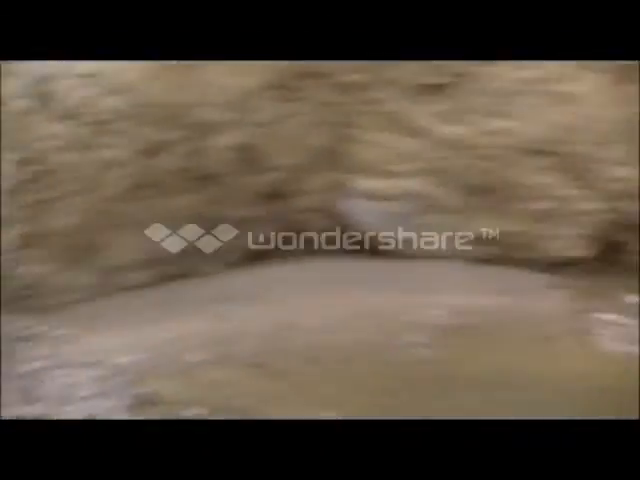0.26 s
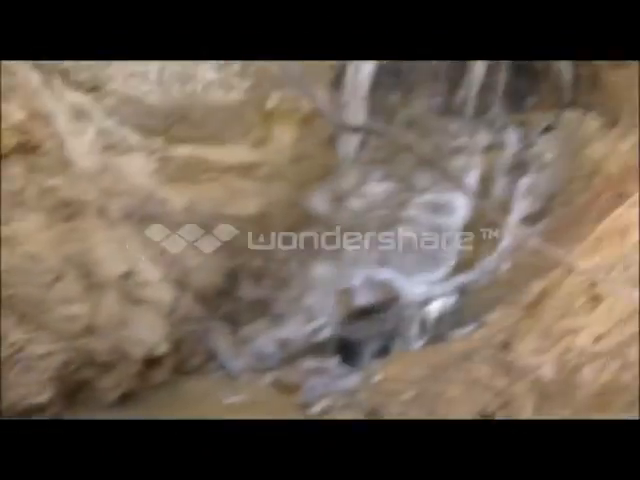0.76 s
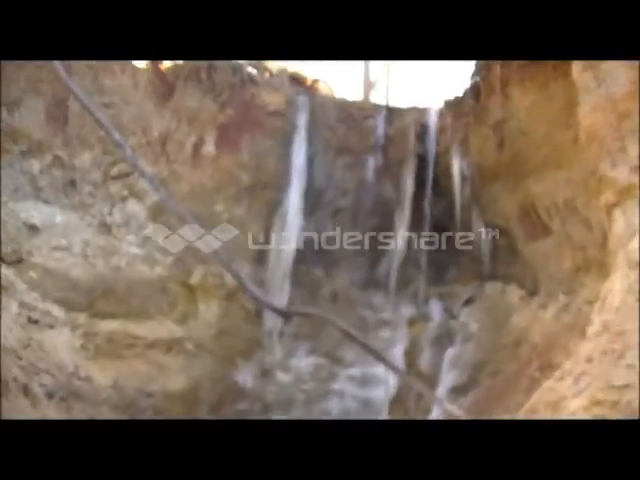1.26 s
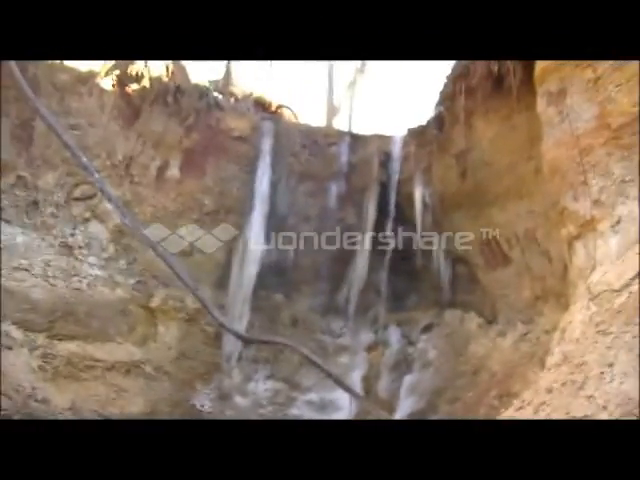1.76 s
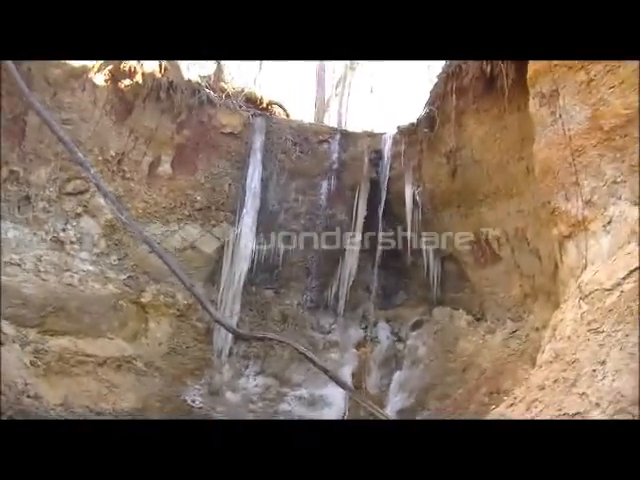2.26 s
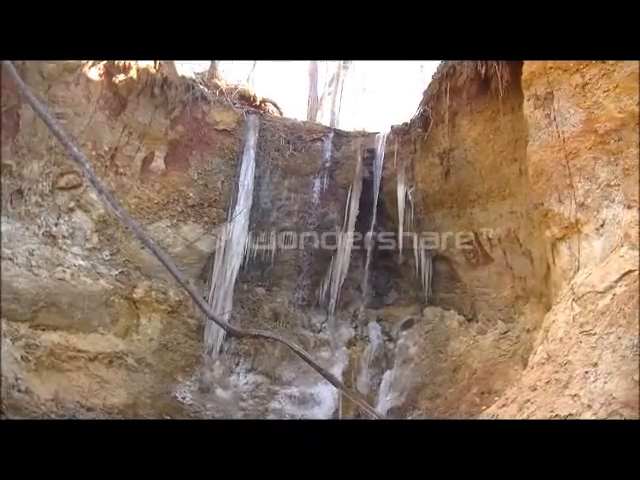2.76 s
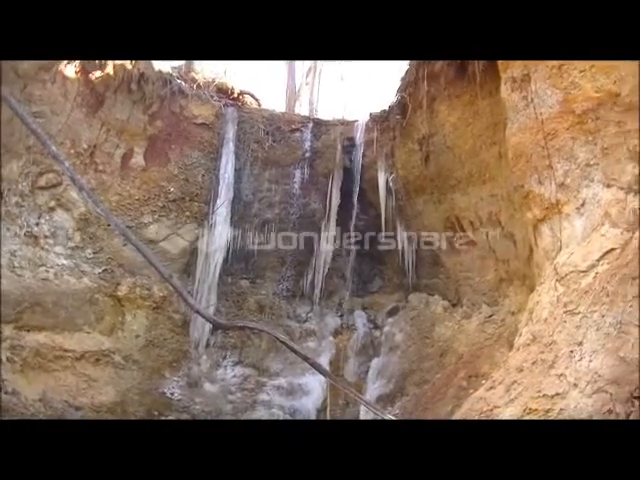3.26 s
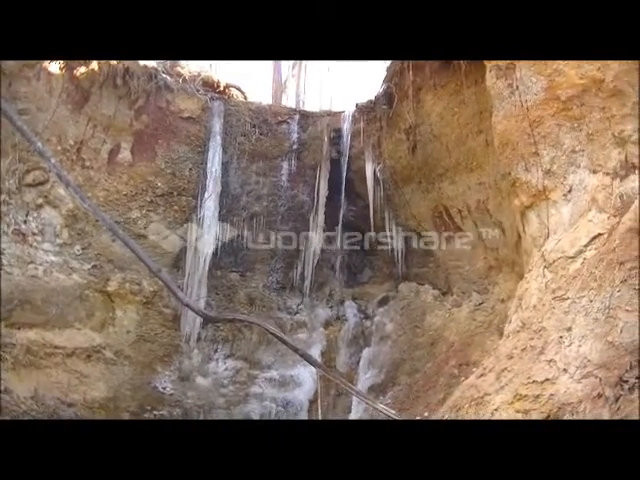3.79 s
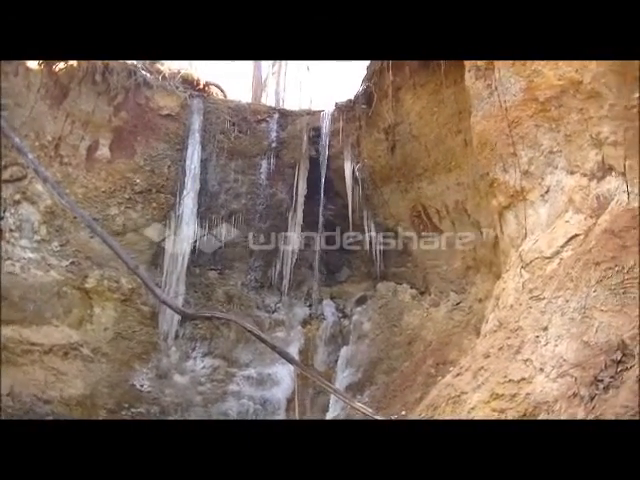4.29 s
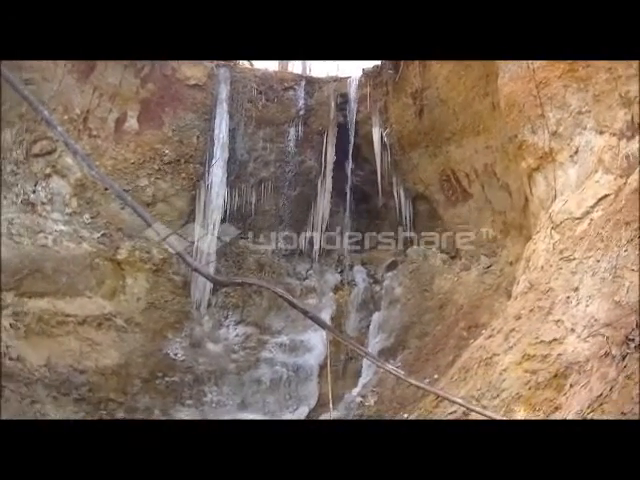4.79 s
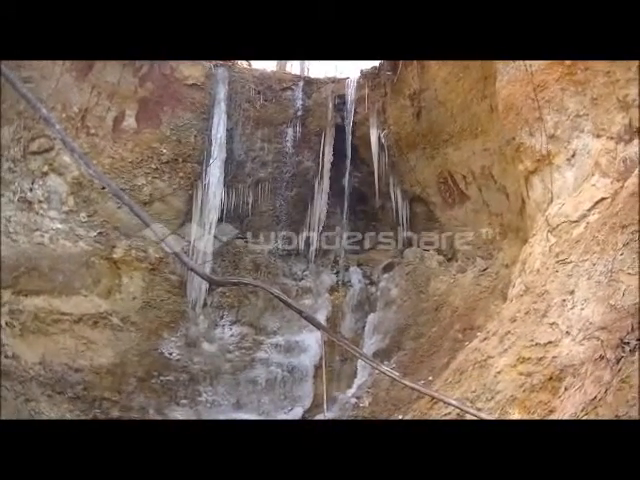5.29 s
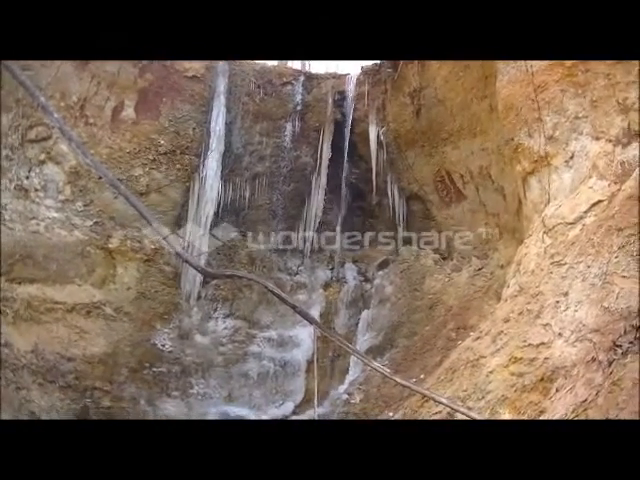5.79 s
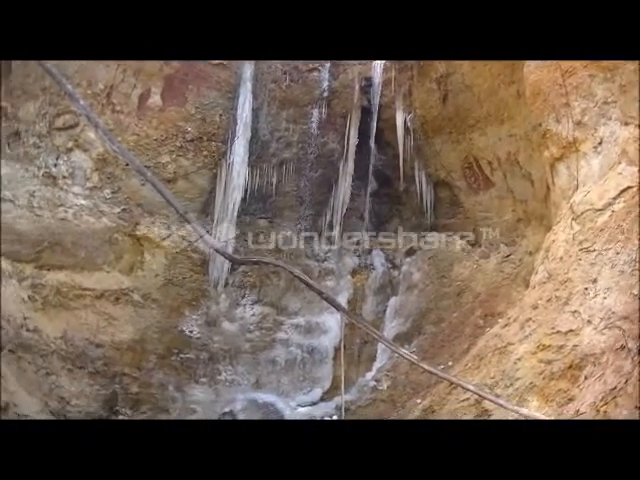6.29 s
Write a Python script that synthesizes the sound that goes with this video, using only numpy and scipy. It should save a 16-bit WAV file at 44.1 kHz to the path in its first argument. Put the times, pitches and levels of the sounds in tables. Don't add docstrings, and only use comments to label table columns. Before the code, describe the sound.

A thin waterfall in a small icy gorge, heard from a few metres away. From 0 to 0.5 s the camera swings round: the wash is slightly dull and off-centre, with a low soft puff of air on the microphone around 0.3 s, then the sound centres and brightens. A continuous broad hiss of dense droplets follows, full from low-mid to treble, fluttering in tiny surges and short lulls. Sharp ticks and wet slaps with brief spray come irregularly, several per second. A hollow plop sounds at 1.36 s; around 1.7 s a brief gush brings a cluster of plops and slaps, with a strong slap at 1.86 s. From 2 to 4 s it is steadier, with a stronger slap and spray at 4.03 s. Small plops return near 5.4 s amid more slaps to 6.1 s, and the hardest, lower slap lands at 6.47 s. The water continues to the end without fading.

```python
import sys
import numpy as np
from scipy import signal
from scipy.fft import rfft, irfft, next_fast_len
from scipy.io import wavfile
from scipy.ndimage import uniform_filter1d

SR = 44100
rng = np.random.default_rng(int(sys.argv[2]) if len(sys.argv) > 2 else 0)


def makeup_ratio(level_db):
    decades = np.asarray(level_db, float) / 20
    return 10 ** decades


def inscribe(sig):
    pcm = np.round(np.clip(np.atleast_2d(sig).T, -1, 1) * 32767)
    wavfile.write(sys.argv[1], SR, pcm.astype(np.int16))


N = 288656


def evened(x):
    return x / np.sqrt(np.mean(x ** 2) + 1e-20)


def smoothed_noise(count, size):
    return evened(uniform_filter1d(rng.standard_normal(count), size))


def filtered(x, order, hz, kind):
    return signal.sosfilt(signal.butter(order, hz, kind, fs=SR, output="sos"), x)


def read(points, hz):
    f, value = np.transpose(points)
    return np.interp(np.log(hz + 1), np.log(f + 1), value)


def follow(rows, t):
    s, *columns = np.transpose(rows)
    return [np.interp(t, s, c) for c in columns]


def add(mix, s, sound):
    part = mix[round(s * SR):][:len(sound)]
    part += sound[:len(part)]


def ramp(hz, from_hz, octaves):
    return np.clip(np.log2((hz + 1) / from_hz) / octaves, 0, 1)[:, None]


def mottle(frames, bins, tall, long):
    noise = rng.standard_normal((frames, bins)).T
    return evened(uniform_filter1d(uniform_filter1d(noise, tall, axis=0), long, axis=1))


def ring(hz, t60, glide, rise):
    t = np.arange(int(t60 * SR) + 8) / SR
    swell = 1 - np.exp(-t / rise)
    return swell * makeup_ratio(-60 * t / t60) * np.sin(2 * np.pi * hz * t * (1 + glide * t / t60))


# (t/s, level/dB)
AIR = [
    (0, -62),
    (.27, -53),
    (.6, -86),
    (1.07, -79),
    (2.4, -97),
    (3.7, -75),
    (5.5, -73),
    (6.15, -88),
    (6.4, -71),
]


def breeze():
    first, second = rng.standard_normal((2, N))
    lumps = evened(filtered([first, 1.1 * second - 0.45 * first], 3, [24, 75], "bandpass"))
    gusts = evened(uniform_filter1d(uniform_filter1d(rng.standard_normal(N), 4000), 4000))
    lumpy_db = 6
    return lumps * makeup_ratio(follow(AIR, np.arange(N) / SR)[0] - 1.0 + lumpy_db * gusts)


# (t/s, peak level/dB, f/Hz, t60/s)
POCKETS = [(.487, -36, 470, 0.13), (1.15, -29.5, 500, 0.065), (1.362, -20.5, 540, .035),
           (1.697, -32, 423, .03), (1.71, -34, 595, .04), (1.724, -25, 495, 0.04), (1.731, -25, 332, 0.041),
           (1.7353, -31, 404, 0.021), (1.741, -28, 967, 0.048), (2.063, -37, 644, 0.036),
           (2.313, -40, 850, .04), (3.57, -41, 150, 0.13), (3.798, -34.5, 630, 0.058),
           (4.134, -33.5, 910, 0.052), (4.223, -38.5, 158, 0.1), (4.739, -39, 130, 0.15),
           (5.368, -29, 651, 0.045), (5.421, -34, 610, 0.079), (6, -33, 485, 0.046)]


def plops():
    out = np.zeros(N)
    for s, db, hz, t60 in POCKETS:
        add(out, s + 0.00097, makeup_ratio(db + 1.0) * ring(hz, t60, .05, 2.0 / hz))
        add(out, s + 0.00083, makeup_ratio(db + 12.0) * ring(1.33 * hz, 2.9 / hz, 0.036, 0.36 / hz))
    return filtered(out, 2, 110, "highpass")


def small_slaps():
    per_s, tick_db, spray_db, spread_db = 4, -30, -42.5, 8.5
    when, pitch, tick, spray = rng.random((round(per_s * N / SR), 4)).T
    tick_db = tick_db + spread_db * (2 * tick - 1)
    spray_db = spray_db + spread_db * (2 * spray - 1)
    return list(zip(.01 + when * N / SR, tick_db, 1600 * 6.3 ** pitch, spray_db))


def slap_tick(db, hz):
    cycles = (np.arange(260) / SR - .003) * hz
    knock = makeup_ratio(db) * np.exp(-(cycles / 1.22) ** 2) * np.cos(2 * np.pi * cycles)
    crack = makeup_ratio(db - 5.5) * np.exp(-(cycles / 0.37) ** 2) * np.sin(2 * np.pi * 1.7 * cycles)
    return knock + crack


def slap_spray(db, hz):
    hold_s, t60_s, rise_s, ragged_db = 0.014, 0.12, 0.00041, 1.2
    t = np.arange(4410) / SR
    band = [max(hz * 0.39, 900), min(hz * 1.84, 15000)]
    spray = evened(filtered(rng.standard_normal(len(t)), 2, band, "bandpass"))
    spray *= makeup_ratio(ragged_db * smoothed_noise(len(t), 90))
    fade_db = -60 * np.maximum(t - hold_s, 0) / t60_s
    return makeup_ratio(db - 2.0 + fade_db) * (1 - np.exp(-t / rise_s)) * spray


# (t/s, tick level/dB, f/Hz, spray level/dB)
CLUMPS = [(0.0251, -20.5, 4040, -55), (0.2232, -16, 4500, -33.5), (.3945, -21, 3080, -34),
          (0.5666, -19, 4690, -33), (.7404, -19, 8770, -38), (1.9127, -24, 2890, -38.5),
          (1.536, -23, 9260, -34.5), (1.706, -19, 5660, -43), (1.7217, -24, 3080, -34),
          (1.7422, -33, 2230, -48), (1.856, -16, 6950, -30.5), (1.9494, -21, 2120, -38),
          (2.2349, -33, 1800, -32), (2.341, -28, 6150, -35), (2.5532, -23, 4040, -38),
          (3.0506, -27, 3480, -30.5), (3.3948, -19, 5660, -38), (3.695, -20, 6040, -35.5),
          (3.7996, -21, 10080, -34), (4.0258, -15, 4000, -28.5), (4.2097, -19.5, 3570, -33),
          (4.3582, -23, 3880, -32), (4.845, -30, 4000, -31.5), (5.099, -29, 4390, -33.5),
          (5.369, -24, 1570, -37.5), (5.449, -19, 2170, -38), (5.5292, -17, 3670, -33.5),
          (5.988, -20, 3530, -31), (6.1225, -23, 8770, -32.5), (6.4721, -12.5, 2290, -27.5)]
# (t/s, tick level/dB, f/Hz)
DRIPS = [(0.1888, -22, 4570), (.608, -23, 1460), (1.7307, -22, 4870), (1.751, -26, 1820),
         (1.817, -29, 6430), (2.043, -18, 10080), (2.467, -21, 5100), (3.641, -19, 7610),
         (4.0045, -24, 7280), (4.0457, -28, 4220), (4.298, -22, 4690), (4.548, -21, 6570),
         (5.2493, -23.5, 3750), (5.43, -26, 2410), (5.583, -25, 7920), (5.868, -21, 8460),
         (6.2771, -24.5, 4390)]


def slaps():
    drip_spray_db = -16.5
    drips = [(s, db, hz, db + drip_spray_db) for s, db, hz in DRIPS]
    out = np.zeros(N + SR)
    for s, db, hz, spray_db in [*CLUMPS, *drips, *small_slaps()]:
        tick = slap_tick(db, hz)
        add(out, s - .0005, slap_spray(spray_db, hz))
        add(out, s - .003, tick)
        add(out, s - .0013, makeup_ratio(-17.5) * tick)
    return filtered(out[:N], 2, 800, "highpass")


def droplets(per_s, spread_db, low_hz, high_hz, turns):
    struck = rng.random(N) < per_s / SR
    size = makeup_ratio(spread_db * np.minimum(rng.exponential(1, N), 4)) * struck
    kind, out = rng.integers(0, 14, N), np.zeros(N)
    for k, hz in enumerate(np.geomspace(low_hz, high_hz, num=14)):
        drop = ring(hz, 3 * turns / hz, 0.25, 0.63 / hz) * hz
        out += signal.oaconvolve(size * (kind == k), drop)[:N]
    return evened(out)


# (t/s, flow level/dB)
STREAM = [(0, -2), (.15, -1.5), (.6, 1), (.9, 1), (1.55, -.5), (1.75, 1), (1.95, 0.5), (2.1, 0), (3.5, -1),
          (4.3, -1), (4.85, -1), (5.05, 0), (5.9, -1), (6.55, -.5)]
# (t/s, level change/dB)
LULLS = [(.14, -3.5), (.28, -2.5), (.375, -3), (.79, -1.5), (.89, -3), (1.01, -3), (1.14, -1), (1.47, -3.5),
         (1.61, -2.5), (1.68, -0.5), (1.735, 3.5), (2.03, -2.5), (2.21, -3.5), (2.26, 0.5), (2.46, -2.5),
         (2.96, 0), (3.44, -1), (3.76, -2.5), (3.97, -0.5), (4.05, 2), (4.11, -2), (4.66, -1.5), (4.9, -2),
         (5.23, -4), (5.34, -0.5), (5.485, -1.5), (5.93, -2), (6.2, -2.5), (6.38, -2), (6.45, -1)]


def flow(t):
    lull_s = 0.034
    return follow(STREAM, t)[0] + sum(db * np.exp(-((t - s) / lull_s) ** 2) for s, db in LULLS)


# (f/Hz, level/dB per Hz)
WASH = [(25, -53), (60, -19), (95, -14), (135, -4.5), (250, -5.5), (490, -5), (950, -3.5), (1650, 0),
        (3000, -2), (5900, -3.5), (6400, -6), (10500, -4), (13500, -6.5), (15200, -13)]
# (f/Hz, width/Hz, level/dB)
HOLLOWS = [(369, 50, 4), (485, 21, 5.5), (607, 57, 4), (910, 14, 2.5), (1207, 41, 0), (1275, 29, 2),
           (1472, 24, 2), (1638, 40, 2), (1870, 89, 0.5), (1884, 17, 0.5), (3170, 91, -1.5), (3536, 82, -4),
           (4200, 310, 2), (4800, 250, -0.1), (5730, 200, 1.3), (8300, 480, -1)]


def gorge_colour(x):
    size = next_fast_len(N)
    hz = np.fft.rfftfreq(size, 1 / SR)
    colour_db = read(WASH, hz)
    colour_db = colour_db + sum(db * np.exp(-((hz - f) / width) ** 2) for f, width, db in HOLLOWS)
    return irfft(rfft(x, size) * makeup_ratio(colour_db), size)[:, :N]


# (f/Hz, level/dB)
SIDEWAYS = [(60, -13), (200, -16), (500, -17), (1000, -18), (1800, -22), (2800, -17), (3700, -11),
            (5200, -13), (7000, -11.5), (10000, -9), (12500, -12), (15000, -14)]
# (t/s, aim at the fall 0-1, tilt down to the pool 0-1)
AIM = [
    (0, .3, .7),
    (.15, .3, .7),
    (.4, .45, .8),
    (.46, .8, .9),
    (.5, 1, 1),
    (1.9, 1, .7),
    (2.1, 1, .3),
    (3.5, 1, 0),
    (6.55, 1, 0),
]


def fall():
    spatter_share, spray_share, churn_share = 0.89, 0.68, 1.47
    dull_away_db, pool_db = -7, 2.5
    patchy_db, flicker_db, echo_patchy_db = 1.43, 0.94, 4.5
    raw = rng.standard_normal((2, N))
    raw[0] += 0.3 * droplets(1500, 4.0, 1520, 13800, turns=2.0)
    raw[0] += 0.15 * droplets(400, 1.5, 276.7, 4003, turns=12.)
    hz, t, z = signal.stft(raw, SR, nperseg=512, noverlap=384)
    aim, tilt = follow(AIM, t)
    mid, high, low = ramp(hz, 1900, 0.69), ramp(hz, 5500, 1.0), ramp(hz, 1700, -1.94)
    share = 1 + (mid - high) * (spatter_share - 1) + high * (spray_share - 1) + low * (churn_share - 1)
    flow_db = share * flow(t)
    flow_db = flow_db + high * dull_away_db * (1 - aim) + low * (pool_db * tilt - 1.5)
    flow_db *= 1 - ramp(hz, 335, -0.67)
    flicker = smoothed_noise(len(t), 6)
    patches = mottle(len(t), len(hz), 4, 12)
    z *= makeup_ratio(flow_db + patchy_db * patches + flicker_db * flicker * (1 - low))
    echo_db = read(SIDEWAYS, hz)[:, None] + 1.0 + echo_patchy_db * mottle(len(t), len(hz), 7, 10)
    z[1] *= makeup_ratio(aim * echo_db)
    return makeup_ratio(-28.0) * gorge_colour(signal.istft(z, SR, nperseg=512, noverlap=384)[1])


def scene():
    air = breeze()
    water = plops() + slaps()
    front, side = fall()
    front = front + water
    pan_on_db, pan_away_db = -0.34, -5.5
    pan_db = pan_on_db + pan_away_db * (1 - follow(AIM, np.arange(N) / SR)[0])
    return np.array([front * makeup_ratio(pan_db / 2) + side, front * makeup_ratio(-pan_db / 2) - side]) + air


# (start t/s, length/s)
FOLDS = [
    (.5, .3),
    (4.57, .09),
    (5.13, .05),
    (5.57, .29),
]


def narrowed(mid, side, hz, t):
    masking = np.sqrt(uniform_filter1d(uniform_filter1d(abs(mid) ** 2, 16, axis=0), 3, axis=1))
    folded = sum((t > s) & (t < s + length) for s, length in FOLDS) * (hz > 4200)[:, None]
    threshold_db = -11 - 12 * ramp(hz, 1000, -2.) + 20 * folded
    return side * (abs(side) > makeup_ratio(threshold_db) * masking)


# (t/s, f/Hz)
EDGE = [
    (0, 13200),
    (.06, 13600),
    (.1, 14700),
    (.45, 14640),
    (1, 15100),
    (4, 15400),
    (5.55, 15100),
    (5.65, 15000),
    (6.1, 15150),
]


def band_limit(hz, t):
    step_hz, flutter_hz = 172, 90
    edge_hz = follow(EDGE, t)[0] + flutter_hz * smoothed_noise(len(t), 3)
    edge_hz = step_hz * np.round(edge_hz / step_hz)
    return np.clip((edge_hz - hz[:, None]) / 250 + .5, 0, 1) ** 2


def roll_off(x):
    return signal.sosfilt(signal.butter(12, 15900, fs=SR, output="sos"), x)


def record(dry):
    hz, t, (left, right) = signal.stft(dry, SR, nperseg=2048)
    mid, side = (left + right) / 2, (left - right) / 2
    side = narrowed(mid, side, hz, t)
    kept = band_limit(hz, t) * np.array([mid + side, mid - side])
    mix = signal.istft(kept, SR, nperseg=2048)[1][:, :N]
    return roll_off(mix)


dry = scene()
out = record(dry)
inscribe(out)
```